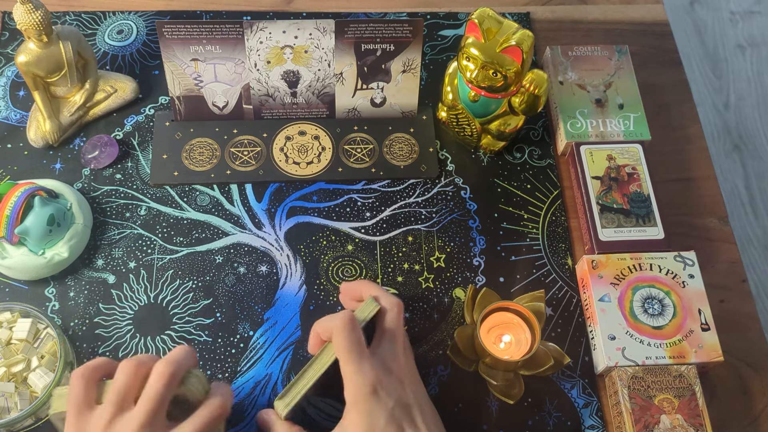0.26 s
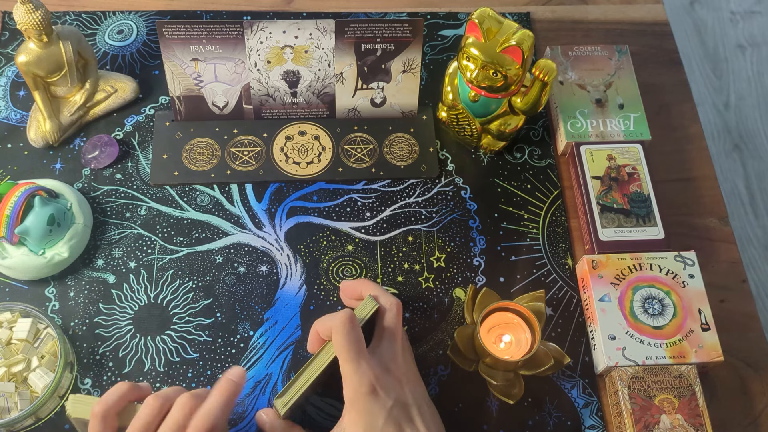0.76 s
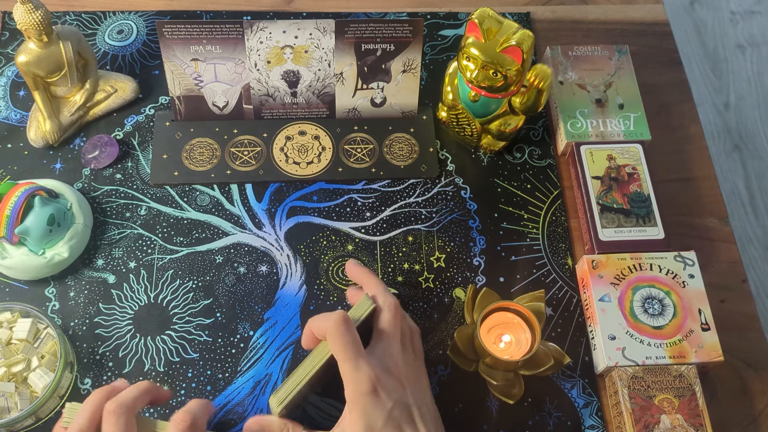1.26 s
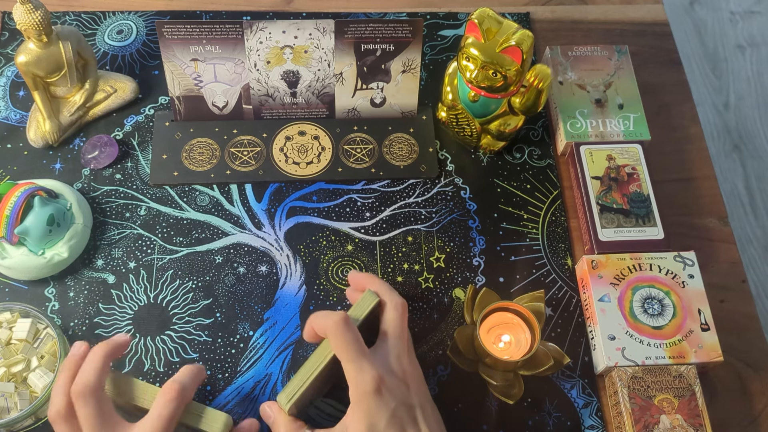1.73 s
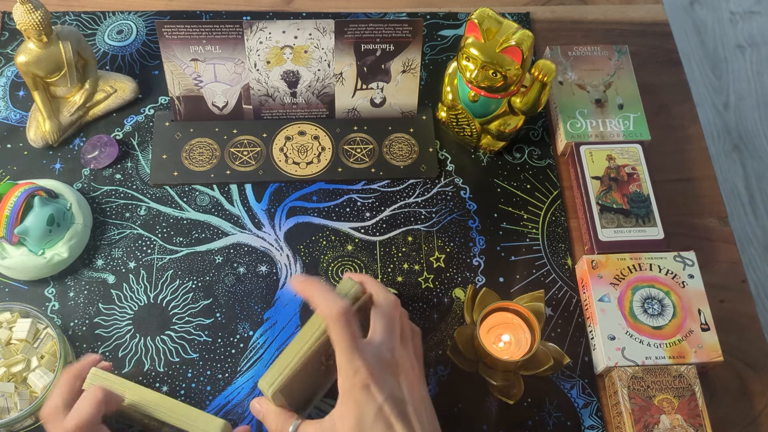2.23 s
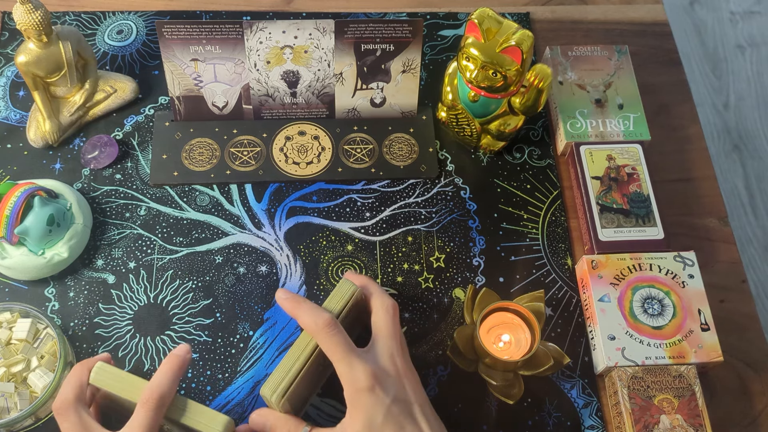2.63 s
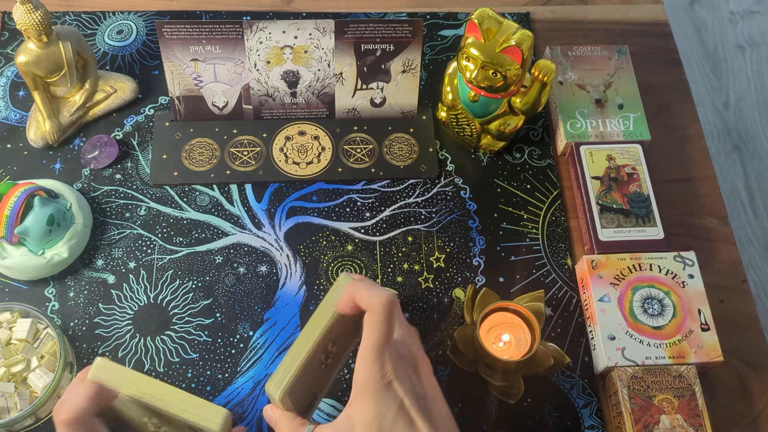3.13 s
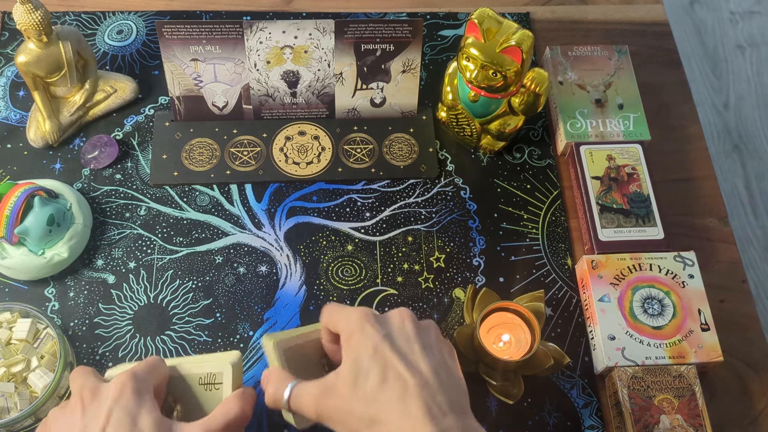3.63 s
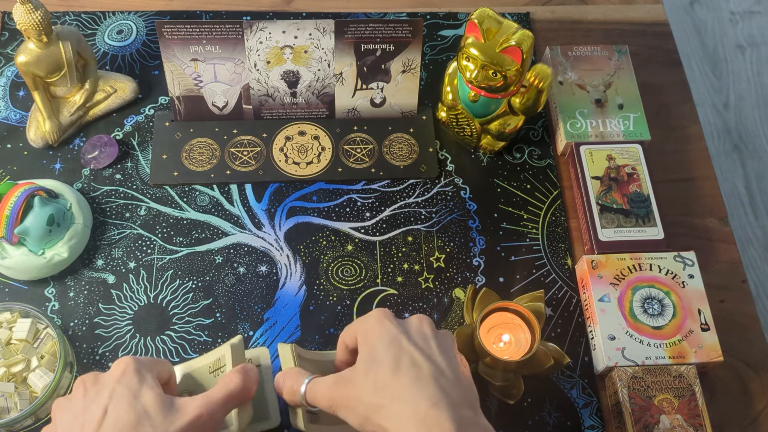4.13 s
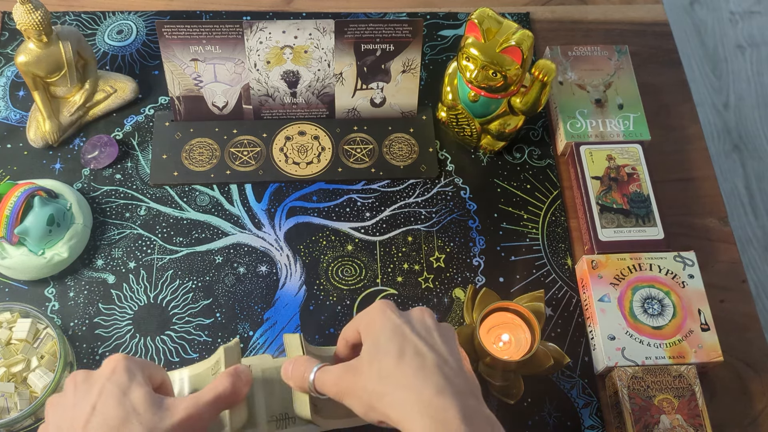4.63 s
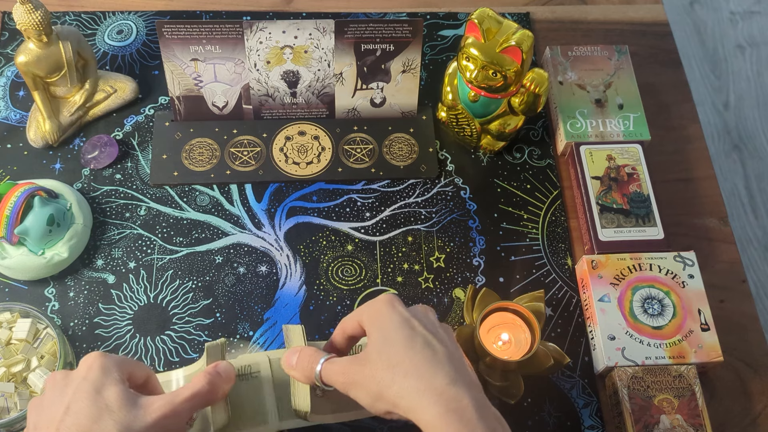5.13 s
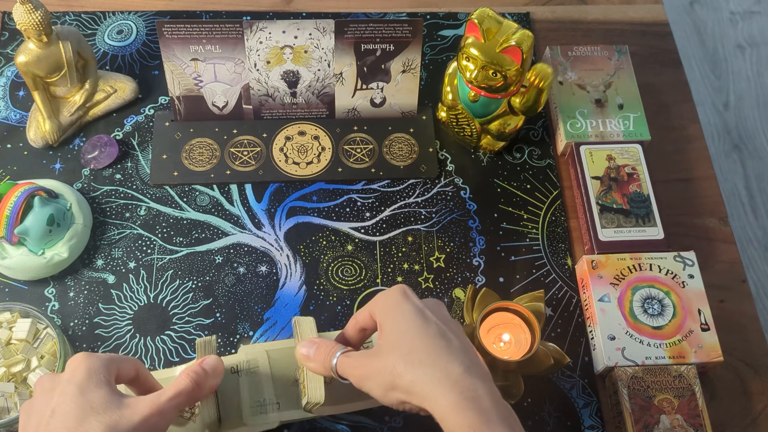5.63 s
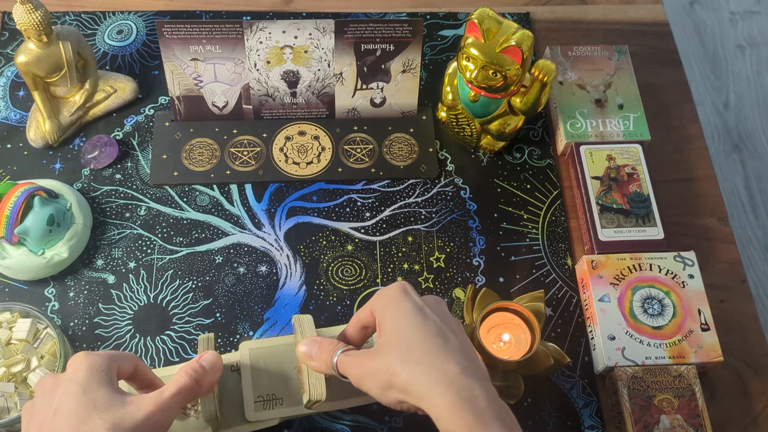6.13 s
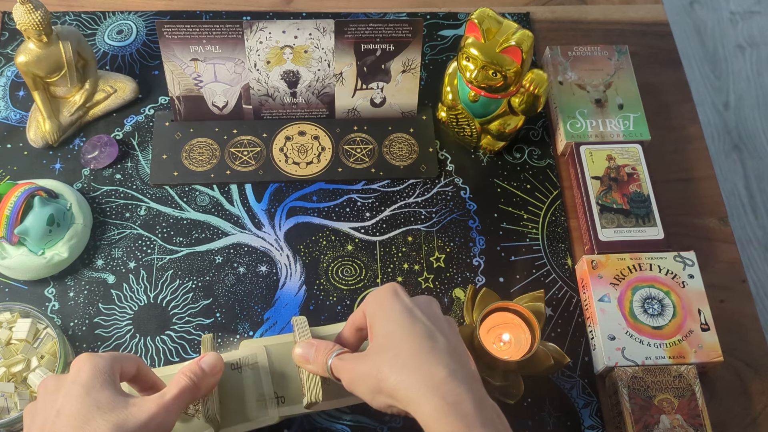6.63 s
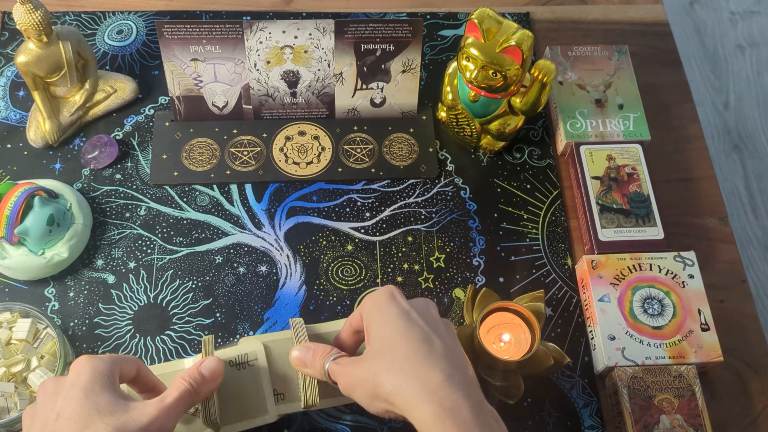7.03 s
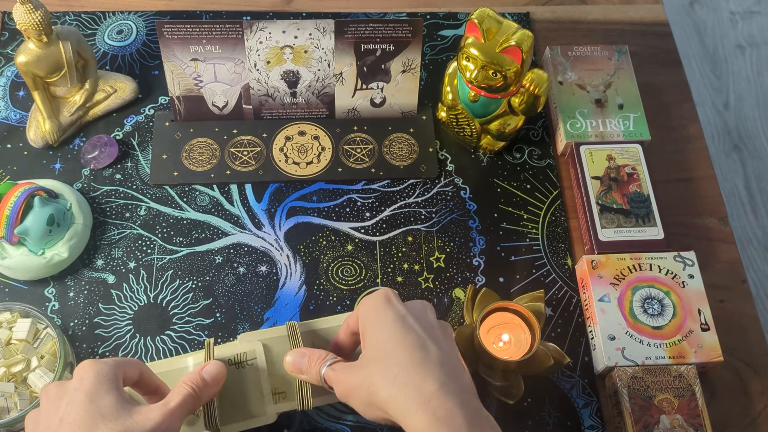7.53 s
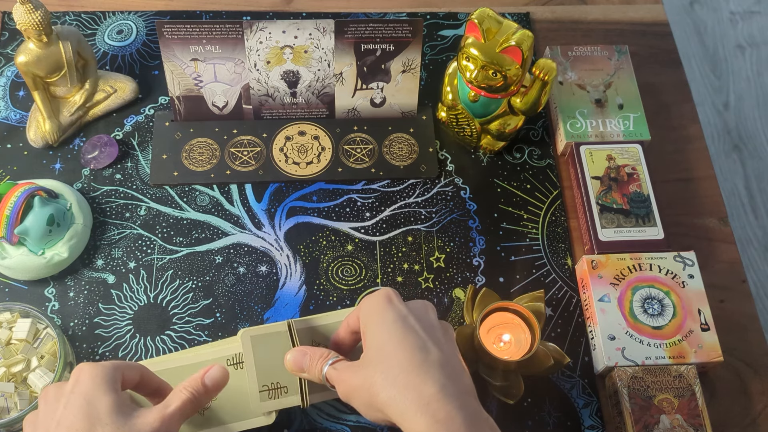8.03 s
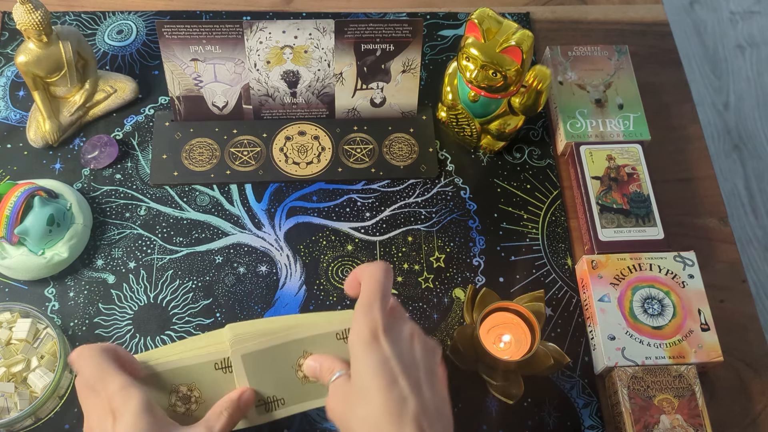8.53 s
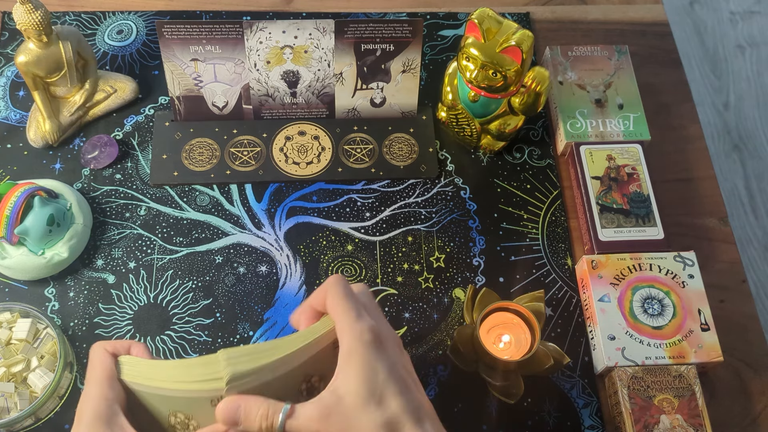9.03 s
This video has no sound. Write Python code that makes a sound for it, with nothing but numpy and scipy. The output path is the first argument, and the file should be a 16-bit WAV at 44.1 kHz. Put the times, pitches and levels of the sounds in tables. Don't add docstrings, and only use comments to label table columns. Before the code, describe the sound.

Close stereo microphone in a small room with a faint, wavering low machinery hum. Halves of a card deck are knocked in short clusters on a wooden table, dull and thumpy, with faint finger rubs. After a near-quiet pause, cards riffle slowly off two thumbs: sharp bright snaps, papery slaps and dry slides, uneven in timing and loudness, ending in soft sliding as the deck is gathered.

```python
import sys
import numpy as np
from scipy import signal
from scipy.fft import rfft, irfft, next_fast_len
from scipy.io import wavfile
from scipy.ndimage import uniform_filter1d

SR = 44100
rng = np.random.default_rng(int(sys.argv[2]) if len(sys.argv) > 2 else 0)


def dump(signal):
    limited = np.clip(np.atleast_2d(signal).T, -1, 1)
    pcm = np.round(limited * 32767).astype(np.int16)
    wavfile.write(sys.argv[1], SR, pcm)


def gain_from_db(level_db):
    decades = np.asarray(level_db, float) / 20
    return 10 ** decades


N = 408807

# snap time in s, snap peak in dB, slap peak in dB,
# left-right difference in dB, edge ring in Hz.
FIRST_CARDS = [(4.5682, -34, -23.5, 3.5, 2700), (4.6594, -16, -24.5, 1, 4770),
               (4.731, -24.5, -34, 4.5, 3400), (4.7531, -27.5, -25.5, -2, 3188),
               (4.8115, -25, -24, -7.5, 3020), (4.8202, -17.5, -19, 5.5, 4350)]
LOOSE_CARDS = [(4.9502, -40, -25.5, 4, 9000), (5.1944, -44, -47, 3, 8800), (5.2904, -33, -25.5, 1, 10910),
               (5.337, -30.5, -18.5, -1.5, 5962), (5.4345, -34.5, -26.5, 2, 10960),
               (5.458, -20.5, -43.5, 3.5, 10600), (5.4975, -43.5, -19.5, -10, 9000),
               (5.5132, -19, -30.5, 0.5, 12700), (5.5819, -33, -25.5, 10, 11000),
               (5.628, -38.5, -30, 1, 9106), (5.6417, -44, -56, -3.5, 11000), (5.6674, -57, -29, -3, 9000),
               (5.681, -22.5, -23, 2, 13200), (5.7315, -6.5, -31.5, 4.5, 9900),
               (5.7861, -9.5, -36, 8.5, 9621), (5.9204, -35, -28.5, 0, 9000),
               (5.9369, -3.5, -28, -0.5, 8100), (6.0798, -40, -33, -5, 9000),
               (6.0931, -21.5, -23.5, 3.5, 10000), (6.137, -4.5, -28, 2.5, 9809)]
TIGHT_CARDS = [(6.2055, -20, -21.5, -1.5, 8500), (6.3293, -8.5, -20.5, 8.5, 7500),
               (6.4569, -18, -26.5, 3.5, 6200), (6.537, -24, -30, -1, 8000), (6.5559, -4.5, -57, -1, 7500),
               (6.6591, -3.5, -33, 4.5, 10400), (6.741, -23, -24.5, 0, 8000), (6.771, -3, -35, 5.5, 6900),
               (7.039, -44.5, -38, 3, 8000), (7.0744, -21, -29.5, 0, 8000), (7.1569, -3.5, -32.5, -3, 7800),
               (7.3783, -14, -21.5, -1, 6500), (7.419, -17, -26, 4, 7800), (7.4675, -13, -23, 5.5, 7500),
               (7.5257, -16.5, -25.5, 3.5, 6700), (7.5927, -14.5, -24, 3, 8200),
               (7.6484, -18, -26, 5.5, 7500), (7.7541, -3, -27, 1.5, 8200), (7.7819, -3, -31.5, 2.5, 8500),
               (7.8989, -31, -34, 1, 8000), (7.9354, -15.5, -23.5, 5, 7900), (8.0051, -3.5, -21, 2, 10500),
               (8.1225, -13, -22, 4.5, 11000), (8.252, -45, -32, 7, 8500), (8.2684, -30, -51, 6, 5240),
               (8.5844, -47.5, -40, 1, 9000), (8.9834, -49.5, -67.5, 3.5, 11000)]
# its cards, edge ring in dB, face flap in dB, pile ring in Hz.
STAGES = [
    (FIRST_CARDS, 18.5, -27.5, 1920),
    (LOOSE_CARDS, 5, -36.5, 1610),
    (TIGHT_CARDS, 6.2, -31.5, 1740),
]
# frequency in Hz, level in dB.
EDGE = [(1000, -62.5), (4200, -5.5), (5500, -1.5), (6800, -1), (8500, -3), (11000, -0.5), (12500, -4),
        (15500, -2.5), (17000, -47.5)]
LEFT_RIGHT = np.array([[.5], [-.5]])


def in_time(rows):
    s, *columns = np.transpose(rows)
    return [np.interp(np.arange(N) / SR, s, c) for c in columns]


def at_hz(points, hz):
    table_hz, db = np.transpose(points)
    return np.interp(np.log(hz + 1), np.log(table_hz), db)


def rms_one(x):
    return x / np.sqrt(np.mean(x ** 2) + 1e-20)


def coloured(x, db_of_hz):
    size = x.shape[-1]
    hz = np.arange(size // 2 + 1) * SR / size
    return irfft(rfft(x) * gain_from_db(db_of_hz(hz)), size)


def ring(x, hz, t60):
    r, w = gain_from_db(-60 / (t60 * SR)), 2 * np.pi * hz / SR
    return signal.lfilter([0, np.sin(w)], [1, -2 * r * np.cos(w), r * r], x + 1e-18)


def add(out, s, burst, db, pan_db):
    burst = burst * gain_from_db(db) / np.abs(burst).max() * gain_from_db(LEFT_RIGHT * pan_db)
    for side, lag in enumerate((0, 5)):
        at = round(s * SR) + lag
        out[side, at:at + burst.shape[1]] += burst[side, :N - at]


def stereo(mid, side):
    # frequency in Hz, left-right likeness as a correlation.
    likeness = [(60, .92), (180, .93), (330, .87), (600, .4), (1600, 0), (5000, .05), (15000, .1)]
    alike = lambda hz: np.clip(at_hz(likeness, hz), -.5, .99)
    mid = coloured(mid, lambda hz: 10 * np.log10(1 + alike(hz)))
    side = coloured(side, lambda hz: 10 * np.log10(1 - alike(hz)))
    return mid + side * [[1], [-1]]


def stereo_noise(spectrum):
    both = stereo(*rng.standard_normal((2, next_fast_len(N))))
    return rms_one(coloured(both, lambda hz: at_hz(spectrum, hz))[:, :N])


def snaps(rise_s=0.0002, fall_s=0.00054, body_s=0.0033, crackle_db=-18, ring_width=0.21):
    # frequency in Hz, left-right difference in dB.
    edge_lean = [(60, 3), (130, -10), (290, -7), (640, 3), (1410, 9), (3100, 0.5), (6820, 9.5),
                 (15000, -11)]
    clean_snap_db, drag_per_db = -3, -1.18
    flap_follows = 0.5
    lead_s = .0027
    near, far = np.zeros((2, N)), np.zeros((2, N))
    t = np.arange(1024) / SR - .003
    lean = lambda hz: at_hz(edge_lean, hz) * LEFT_RIGHT
    face = lambda hz: -14 * np.log2(hz / 2600 + 1e-3) ** 2
    releases = [(*card, ring_db, face_db) for cards, ring_db, face_db, _ in STAGES for card in cards]
    for s, db, _, pan_db, edge_hz, ring_db, face_db in releases:
        flap_db = face_db + flap_follows * db
        drag = 1 + np.clip(drag_per_db * (clean_snap_db - db), 0, 1.5)
        noise = rng.standard_normal((3, len(t)))
        click = np.sign(noise[0, 0]) * (np.arange(len(t)) == np.argmax(t > 0)) * np.ones((2, 1))
        noise = .85 * noise[0] + .5 * noise[1:]
        burst = np.exp(np.where(t < 0, t / rise_s, -t / fall_s) / drag)
        crackle = gain_from_db(crackle_db) * drag ** 2.8 * noise * burst
        bump = lambda hz: np.exp(-(np.log(hz / edge_hz + 1e-9) / ring_width) ** 2)
        edge = lambda hz: at_hz(EDGE, hz) + ring_db * bump(hz)
        crack = coloured(click + crackle, lambda hz: edge(hz) + lean(hz))
        add(near, s - lead_s, crack, db + 7.5, pan_db * 1.77)
        flap = noise * np.exp(-np.abs(t) / np.where(t < 0, rise_s, body_s))
        add(near, s - lead_s, coloured(flap, face), flap_db + 13.5, pan_db * 2.0)

        clean = rms_one(coloured(click, edge))
        dragged = coloured(click + 2.0 * (drag - 1) * crackle[0], edge)
        crest_db = 20 * np.log10(np.abs(rms_one(dragged)).max() / np.abs(clean).max())
        add(far, s - lead_s, dragged, db + crest_db - 0.5, 0)
        add(far, s - lead_s, coloured(click, face), flap_db + 19.0, 0)
    return near, far


def landings():
    # time in s, peak in dB, ring in Hz.
    lone_slaps = [(4.557, -35.5, 1280), (4.644, -26.5, 1450), (4.74, -24, 1510), (4.796, -25, 1320),
                  (4.889, -48, 1180), (4.907, -33, 1240), (4.934, -26, 1400), (4.986, -29, 1390),
                  (4.999, -27, 1430), (5.016, -30.5, 1420), (5.156, -26.5, 1526), (5.169, -31, 1460),
                  (5.822, -35.5, 1400), (6.265, -26.5, 2925), (6.275, -50.5, 1100), (6.318, -29, 2930),
                  (5.215, -37.5, 1300), (5.253, -35, 1250), (5.277, -28.5, 1430), (5.323, -25.5, 1360),
                  (5.421, -29, 1500), (5.192, -36, 1300), (5.207, -38, 1500), (5.313, -34, 900),
                  (5.445, -35, 1500), (7.147, -35, 1500), (7.368, -35, 1800), (5.767, -22.5, 1600),
                  (6.001, -28.5, 1540), (6.196, -33.5, 1015), (7.074, -37, 1210), (7.232, -21.5, 2134),
                  (7.416, -45, 930.5), (8.053, -22, 1000)]
    # time in s, peak in dB, ring in Hz.
    corner_ticks = [(0.81, -46, 1520), (2.1393, -52.5, 1460), (2.247, -54, 1160), (2.382, -56, 1095),
                    (4.0344, -51.5, 931), (4.0755, -47.5, 1060), (4.1006, -73, 1080), (7.0661, -31, 985),
                    (8.543, -44, 1614), (8.666, -48.5, 1344), (8.784, -51.5, 1610)]
    # time in s, peak in dB.
    settles = [(5.1, -41), (5.566, -33), (5.755, -43.5), (6.183, -44), (6.263, -34), (6.306, -38.5),
               (6.524, -35), (6.642, -36.5), (7.051, -37), (7.21, -39.5), (7.277, -32.5), (7.288, -35),
               (7.902, -33.5), (6.732, -36), (6.545, -42), (8.181, -34.5), (8.261, -35), (8.583, -43.5)]
    slap_lead_s, settle_hz, pile_spread = .0004, 411, .05
    rows = [(s - slap_lead_s, db, hz) for cards, *_, hz in STAGES for s, _, db, *_ in cards]
    rows += [(s, db, settle_hz) for s, db in settles]
    spread = np.exp(pile_spread * rng.standard_normal(len(rows)))
    return [(s, db, hz * k) for (s, db, hz), k in zip(rows, spread)] + lone_slaps + corner_ticks


def slaps(thud_db=-19, tick_db=-16):
    over_db, under_db = 1.5, -21
    puff_s, puff_share = .0008, .45
    thud_gain_db_per_s = 1.5
    near, far = np.zeros((2, N)), np.zeros((2, N))
    t = np.arange(3300) / SR
    steep = signal.butter(2, [290, 4500], "band", fs=SR, output="sos")

    def pile(x, hz):
        over = gain_from_db(over_db) * ring(x, hz * 1.67, 2.0 / hz)
        under = gain_from_db(under_db) * ring(x, hz / 3, 1.2 / hz * 3)
        return signal.sosfilt(steep, ring(x, hz, 6.9 / hz) + over + under)

    click = np.ones((2, 1)) * np.exp(-t / .0001)
    for s, db, hz in landings():
        noise = rng.standard_normal((3, len(t)))
        puff = puff_share * (noise[0] + 0.5 * noise[1:]) * np.exp(-t / puff_s)
        add(near, s, pile(click + puff, hz), db + 1.0, .8)
        thud = ring(click, 136.0, 0.084) * np.sign(noise[0, 0])
        add(near, s, thud, db + thud_db + thud_gain_db_per_s * (s - 6) + 3 * noise[1, 0], 0)
        tick = noise[1:, :256] * np.exp(-t[:256] / 0.0015)
        add(near, s, coloured(tick, lambda hz: at_hz(EDGE, hz)), db + tick_db, 0)
        add(far, s, pile(click, hz), db + 3.0, 0)
    return near, far


def slides(grain_db=2.5):
    # start in s, held time in s, rub in dB,
    # edge rasp over it in dB, hiss over it in dB.
    strokes = [(0.0, .02, -67, -12, -1.5), (0.36, 0.057, -60.5, -5.5, -6.5),
               (0.803, 0.0071, -75.5, 7, 12.5), (1.74, 0.11, -54.5, -24, -15), (2.388, .01, -71, -6, -1),
               (2.631, 0.14, -69, -2, 1), (4.088, 0.0057, -69.5, -5, -5), (4.6, .02, -60, -21, 1.5),
               (4.698, 0.017, -49.5, 3, 6), (4.85, 0.18, -48.5, -6.5, -11), (5.2, .3, -79.5, -9, 17.5),
               (5.55, 0.36, -62, -21, 5), (5.8, 0.51, -75, 1, 2), (6.6, 0.33, -53, 7, 8),
               (6.95, 0.18, -59, -7, -0.5), (7.22, 0.083, -47.5, -3, -3.5), (7.45, 0.25, -64.5, 13, -3.5),
               (7.8, 0.056, -47, 4.5, -21), (7.95, 0.25, -54.5, 11.5, 3.5), (8.3, 0.092, -50.5, -6.5, -6.5),
               (8.449, 0.43, -63.5, -4.5, -1.5), (8.99, 0.014, -70, -18, 7), (9.2, .11, -60.5, 7.5, 4.5)]
    # frequency in Hz, level in dB per Hz.
    rub = [(250, -3), (500, -4), (1400, -3.5), (2000, -2), (3500, -21), (8000, -38.5)]
    rasp = [(1200, -30), (1900, -12), (2600, -3), (3400, 0), (3900, -5), (4300, -18), (7000, -22),
            (12000, -36)]
    hiss = [(2500, -20), (4500, 9), (7000, 4), (11000, -4), (15500, -13.5), (17000, -37.5)]
    start_db_per_s, stop_db_per_s = 339.5, 130
    t = np.arange(0, N + 64, 64) / SR
    s, held_s, db, rasp_db, hiss_db = np.transpose(strokes)[:, :, None]
    rise_db = start_db_per_s * np.maximum(s - t, 0)
    fall_db = stop_db_per_s * np.maximum(t - s - held_s, 0)
    shape_db = db - 3.5 - rise_db - fall_db
    strongest = [gain_from_db((shape_db + over).max(axis=0)) for over in (0, rasp_db, hiss_db)]
    levels = in_time(np.transpose([t] + strongest))
    grain = gain_from_db(grain_db * rms_one(uniform_filter1d(rng.standard_normal((3, N)), size=300)))
    kinds = zip(grain, levels, (rub, rasp, hiss))
    return sum(g * level * stereo_noise(colour) for g, level, colour in kinds)


def squeak():
    # start in s, length in s, level in dB, first pitch in Hz, last pitch in Hz.
    glide = (8.768, .028, -56, 1480, 1650)
    s, length_s, db, from_hz, to_hz = glide
    out, u = np.zeros((2, N)), np.linspace(0, 1, int(length_s * SR))
    rough = 1 + 0.5 * rms_one(uniform_filter1d(rng.standard_normal(len(u)), size=80))
    phase = 2 * np.pi * np.cumsum(from_hz + (to_hz - from_hz) * u) / SR
    tone = np.sin(np.pi * u) * rough * np.sin(phase)
    add(out, s, np.array([tone, tone]), db, 0)
    return out


def knocks(clap_s=0.0036, far_db=6):
    # time in s, peak in dB, thump in dB, thump pitch in Hz,
    # crack over 900 Hz in dB.
    blows = [(0.009, -54.5, -12, 136, -25), (0.325, -38, -32, 107, -5.5), (0.343, -35, -7.5, 172, -18),
             (0.362, -27.5, -1, 156.2, -9.5), (0.379, -32, -4, 156, -20), (0.679, -45.5, -8.5, 109, -2.5),
             (0.692, -33, -7, 121, -43), (0.781, -41.5, 9, 136.4, -2), (0.799, -32, -10, 145, -7),
             (1.667, -33.5, -11, 182, -5.5), (1.676, -29, 2.5, 166, -20), (1.69, -25.5, 1, 125, 6),
             (2.62, -32.5, -3, 154.6, -7.5), (2.631, -31, 4, 132.3, -19), (2.661, -36.5, 6.5, 111.8, -8.5)]
    # multiple of the thump pitch, level in dB, t60 in s.
    thump_modes = [(1.0, 6, 0.45), (1.31, -26, 0.07), (.64, -49.5, 0.35)]
    # frequency in Hz, level in dB, t60 in s.
    body_modes = [(244, -7, 0.051), (293, -2.5, 0.12), (337.3, 0.5, 0.085), (390, -8, 0.13),
                  (430, -3.5, 0.083), (516, -4, 0.074), (555, -3.5, 0.094), (634, -1.5, 0.11),
                  (699, -10, .15), (746, -17.5, 0.53), (911, -21.5, 0.24)]
    # frequency in Hz, level in dB.
    crack_colour = [(450, -21), (700, 1.5), (1100, 9), (1500, -1.5), (2200, -4.5), (2500, -22),
                    (2900, -16.5), (4000, -37), (12000, -47)]
    # frequency in Hz, level in dB, t60 in s.
    deck_modes = [(1046, 1, 0.15), (1128, 9.5, 0.074), (1405, -6.5, 0.11), (1604, -13, 0.05),
                  (1990, -8.5, 0.12), (2250, -5, 0.18), (2970, -14, .15)]
    deck_ring_db, body_to_room_db, detune_per_db = -8.5, -2.5, .025
    hard_clap_db, dulling_per_octave = -15.5, 0.41
    contact_cut_hz, cut_per_crack_db = 630, .25
    direct, table, far = np.zeros((3, 2, N))
    t = np.arange(16384) / SR
    push = np.gradient(t ** 2 * np.exp(-t / .0012))
    for s, db, thump_db, thump_hz, crack_db in blows:
        thump = sum(gain_from_db(level_db) * ring(push, thump_hz * k, t60) for k, level_db, t60 in thump_modes)
        add(direct, s, np.array([thump, thump]), db + thump_db - 4.0, -.4)

        cut_hz = contact_cut_hz * gain_from_db(cut_per_crack_db * (crack_db + 5))
        blow = signal.sosfilt(signal.butter(2, cut_hz, fs=SR, output="sos"), (t == 0) * 1.)
        body = np.zeros(len(t))
        for (hz, level_db, t60), luck_db in zip(body_modes, rng.normal(0, 2.03, len(body_modes))):
            mode = ring(blow, hz * np.exp(detune_per_db * luck_db), t60)
            body += gain_from_db(level_db + luck_db) * rng.choice([-1, 1]) * mode
        add(table, s, np.array([body, body]), db - 0.5, -.4)

        dulling = dulling_per_octave * min(db + crack_db - hard_clap_db, 0)
        dull = lambda hz: dulling * np.log2(np.maximum(hz / 1400, 1))
        colour = lambda hz: at_hz(crack_colour, hz) + dull(hz)
        clap = rng.standard_normal((2, 4096)) * np.exp(-t[:4096] / clap_s)
        clap = np.roll(clap, 60, axis=1)
        add(direct, s - 60 / SR, coloured(clap + clap[0], colour), db + crack_db - 0.5, -.4)
        drive = np.pad(clap[0], (0, 4096))
        rung = sum(gain_from_db(level_db) * ring(drive, hz, t60) for hz, level_db, t60 in deck_modes)
        rung = coloured(rung, dull)
        add(direct, s, np.array([rung, rung]), db + crack_db + deck_ring_db, -.4)
        even = coloured((np.arange(4096) == 400) * np.ones((2, 1)), colour)
        add(far, s - 200 / SR, even[:, 200:], db + crack_db + far_db, 0)
    return direct + table, gain_from_db(body_to_room_db) * table + far


def room(x, wet_db, fill_s=0.0038):
    # frequency in Hz, t60 in s.
    decay = [(100, 0.52), (400, 0.55), (1500, 0.45), (5000, 0.55), (14000, 0.44)]
    # frequency in Hz, level in dB.
    tone = [(100, 17.5), (400, -2), (1500, 1.5), (3000, 0), (4300, 2.5), (6000, 1.5), (9000, 6.5),
            (12000, -4.5), (15000, 4)]
    # delay in s, left level in dB, right level in dB.
    echoes = [(.0012, -16, -20.5), (.0076, -13, -9), (0.0105, -10.5, -11), (0.0185, -19, -18)]
    tail_bend_db_per_s2 = 121
    echo_thin_hz, echo_blur = 3800, 0.72
    t = np.arange(SR // 2) / SR
    tail, edges = np.zeros((2, len(t))), 70 * 2 ** np.arange(0, 8.1, .5)
    for low, high in zip(edges, edges[1:]):
        noise = rng.standard_normal(tail.shape)
        band = signal.sosfilt(signal.butter(2, [low, high], "band", fs=SR, output="sos"), noise)
        centre_hz = low * 1.19
        fall_db = 60 * t / at_hz(decay, centre_hz) + tail_bend_db_per_s2 * t ** 2
        tail += band * gain_from_db(at_hz(tone, centre_hz) - fall_db)
    tail = stereo(*tail) * gain_from_db(wet_db) * (1 - np.exp(-(t / fill_s) ** 2))
    thin = signal.butter(2, echo_thin_hz, "high", fs=SR)
    for s, left_db, right_db in echoes:
        scatter = rng.standard_normal((2, 48)) * np.exp(-t[:48] / 0.00027983)
        smear = signal.lfilter(*thin, 2.58 * (t[:48] == 0) + echo_blur * scatter)
        at = round(s * SR)
        tail[:, at:at + 48] += gain_from_db(np.array([[left_db], [right_db]]) - 7.5) * smear
    return signal.fftconvolve(x[:1], tail, axes=1)[:, :N]


def hum(waver_hz=1.48):
    # time in s, level in dB.
    swell = [(0, -53.5), (.52, -54.5), (1.0, -50.5), (1.5, -50.5), (2.5, -53), (3.6, -51.5), (4.05, -51),
             (4.3, -55), (6.0, -52), (7.5, -54), (8.18, -48.5), (8.96, -53.5), (9.27, -44)]
    line_hz = (50.2, 99.3)
    # frequency in Hz, bandwidth in Hz, level in dB.
    whines = [(147.2, 4.1, -69), (284, 3.1, -76), (392.6, 17, -77.5), (554.3, 16.7, -87.5)]
    # frequency in Hz, level in dB.
    air = [(32, -35.5), (42, -13), (60, -6), (80, -9.5), (125, -8.5), (160, -11), (200, -27.5),
           (400, -30.5), (560, -37), (1600, -40.5), (8000, -47.5), (11600, -55.5), (12500, -74.5),
           (16000, -79)]
    # time in s, change in dB.
    lapses = [(.62, -10), (1.36, -12), (2.3, -49), (3.02, -13), (3.8, -20)]
    lines_db, leans_db, wander_db = (-6, -1), (-6, 1.6448), 4.5
    lapse_s, air_db = 0.04117, -58.5
    t = np.arange(N) / SR
    out, (db,) = gain_from_db(air_db) * stereo_noise(air), in_time(swell)
    db = db + sum(drop_db * np.exp(-((t - s) / lapse_s) ** 2) for s, drop_db in lapses)
    for line_db, lean_db, hz in zip(lines_db, leans_db, line_hz):
        waver, wander = rms_one(uniform_filter1d(rng.standard_normal((2, N)), size=9000))
        level_db = db + line_db + wander_db * wander + 2.0 + lean_db * LEFT_RIGHT
        out = out + gain_from_db(level_db) * np.sin(2 * np.pi * np.cumsum(hz + waver_hz * waver) / SR)
    for hz, width_hz, whine_db in whines:
        out = out + gain_from_db(whine_db) * rms_one(ring(rng.standard_normal(N), hz, 6.6 / width_hz))
    return out


def scene():
    snap, snap_far = snaps()
    slap, slap_far = slaps()
    table, table_far = knocks()
    answer = room(snap_far + slap_far, wet_db=-38.0) + room(table_far, wet_db=-33.5, fill_s=0.0027)
    return snap + slap + table + answer + slides() + hum() + squeak()


def low_pass(x):
    return signal.sosfilt(signal.butter(12, 16760, fs=SR, output="sos"), x)


def record(dry):
    heard = signal.sosfilt(signal.butter(4, [38, 16600], "band", fs=SR, output="sos"), dry)
    heard = heard - .4 * signal.lfilter(*signal.iirpeak(4300, 6, fs=SR), heard)
    top = signal.cheby2(12, 50, 16800, fs=SR, output="sos")
    mix = signal.sosfilt(top, np.clip(heard, -1, 1))
    return low_pass(mix)


dry = scene()
out = record(dry)
dump(out)
```